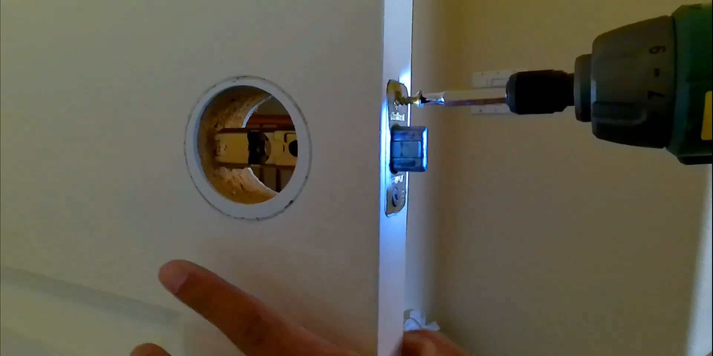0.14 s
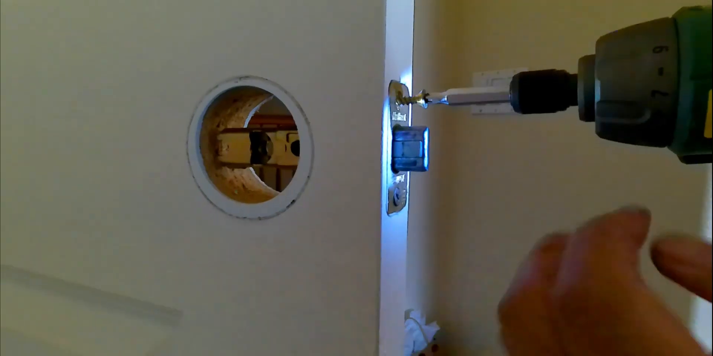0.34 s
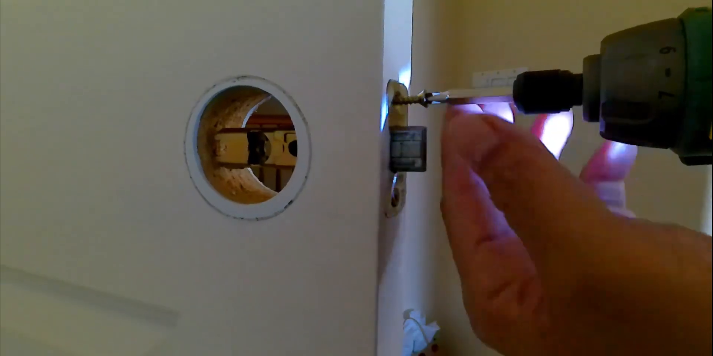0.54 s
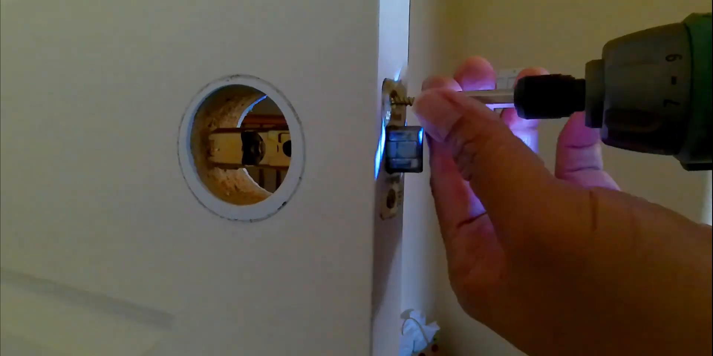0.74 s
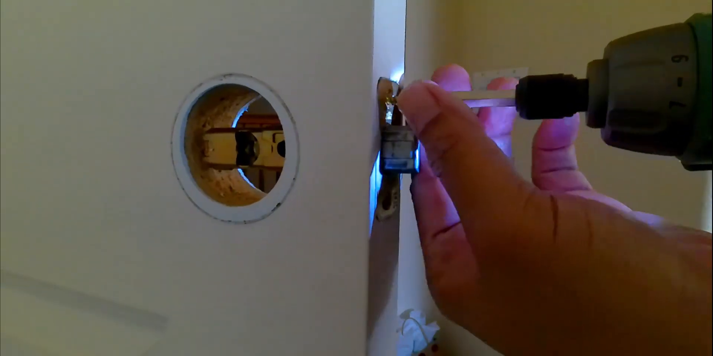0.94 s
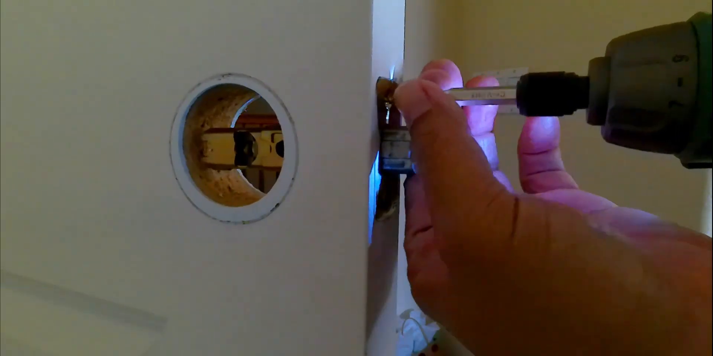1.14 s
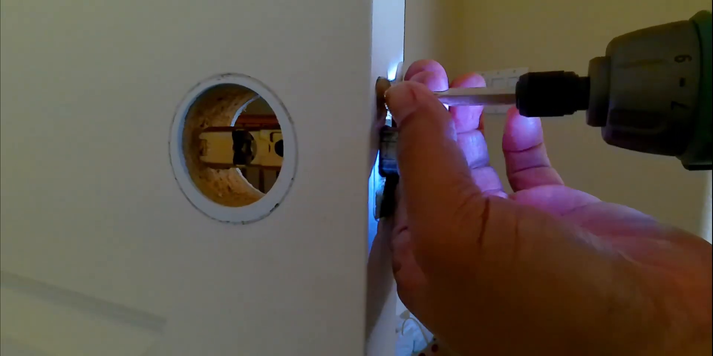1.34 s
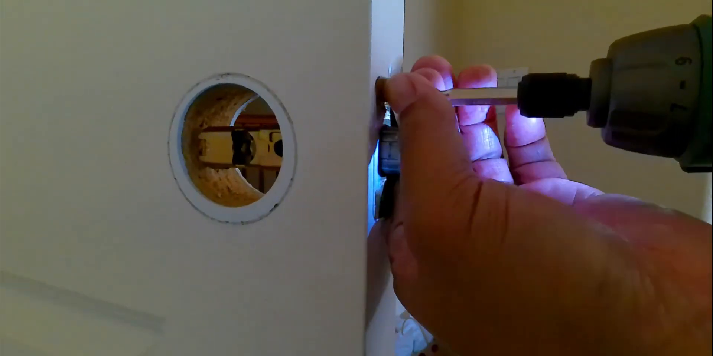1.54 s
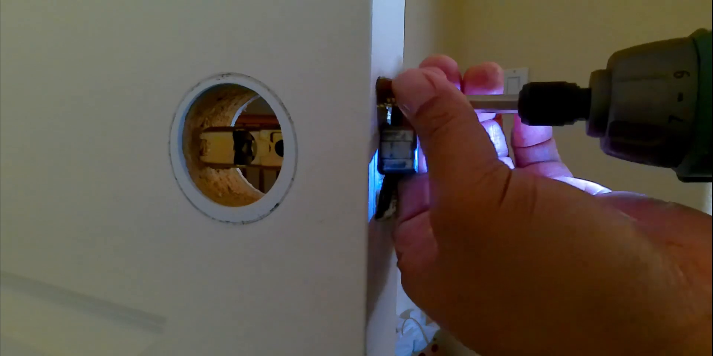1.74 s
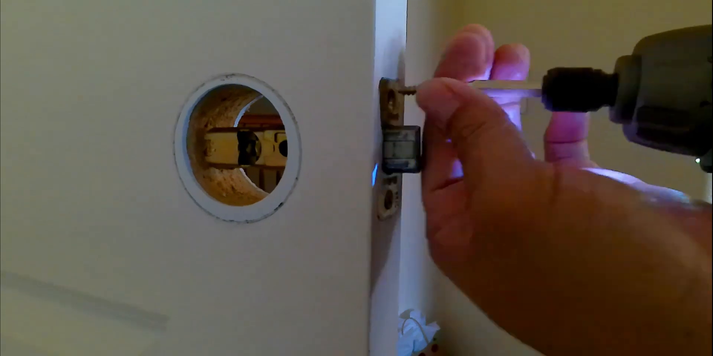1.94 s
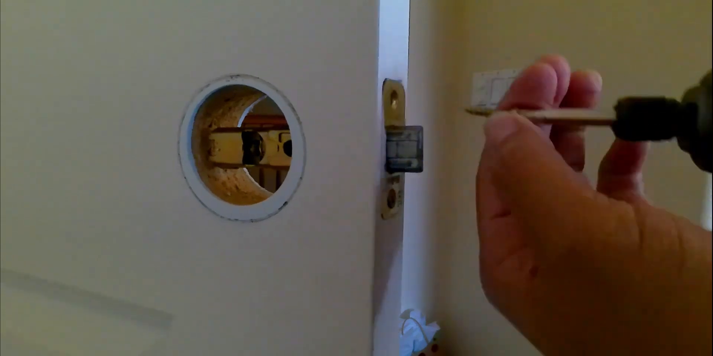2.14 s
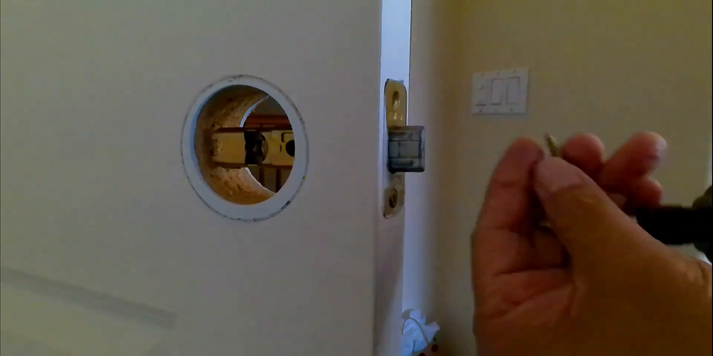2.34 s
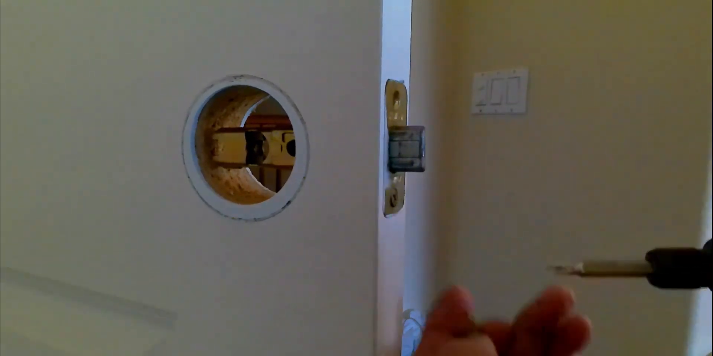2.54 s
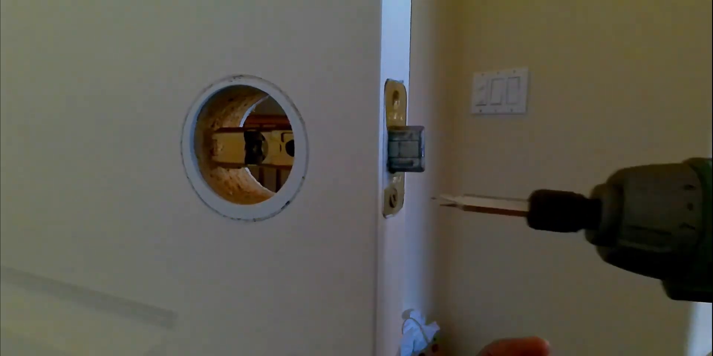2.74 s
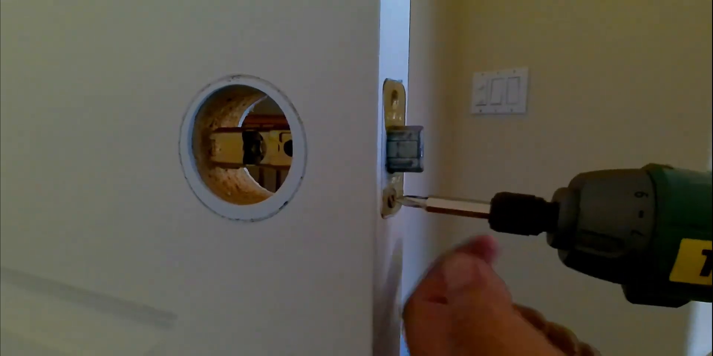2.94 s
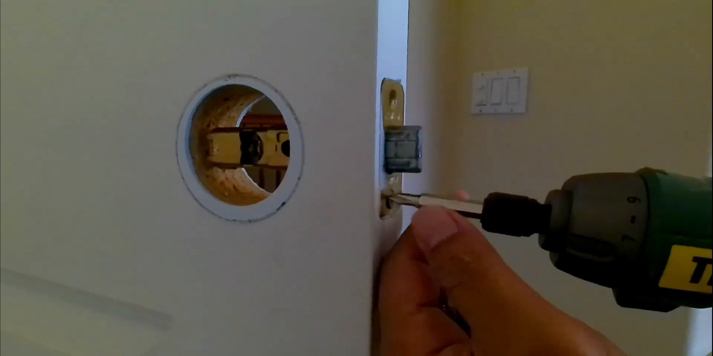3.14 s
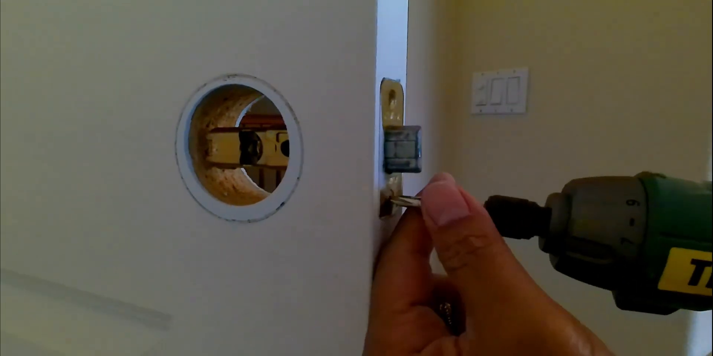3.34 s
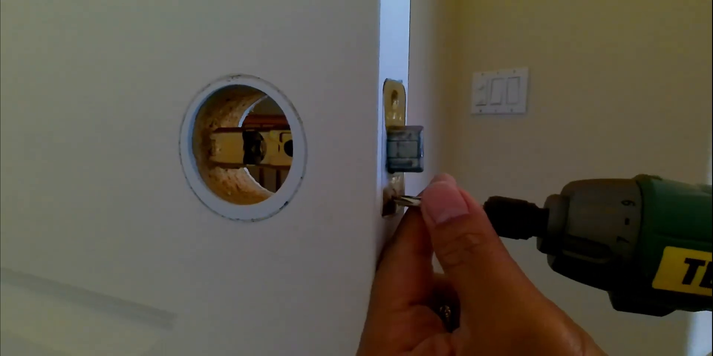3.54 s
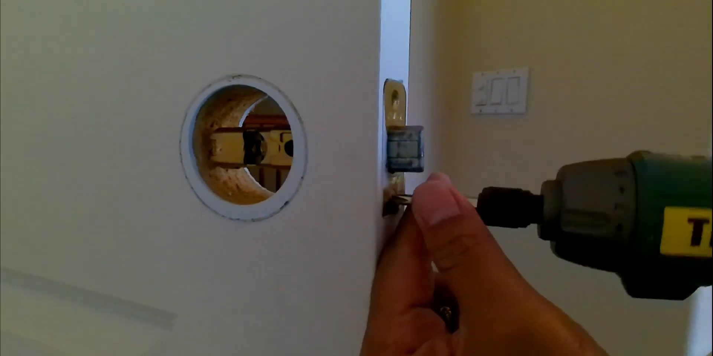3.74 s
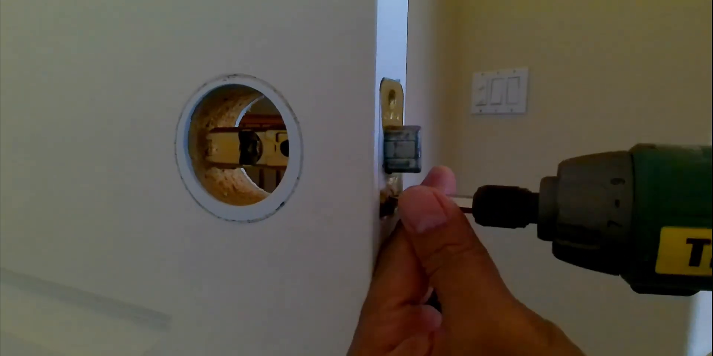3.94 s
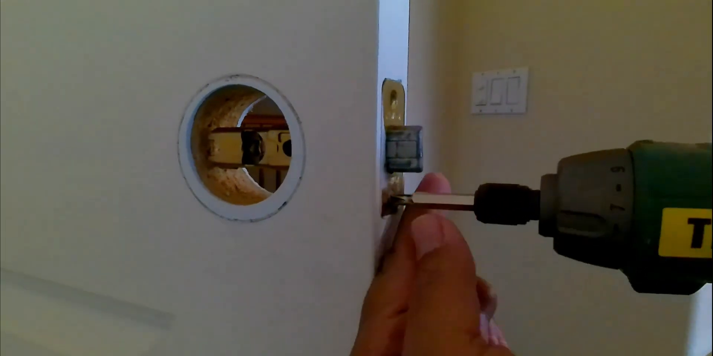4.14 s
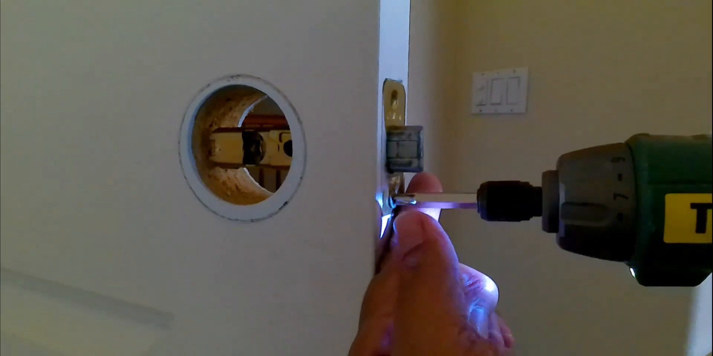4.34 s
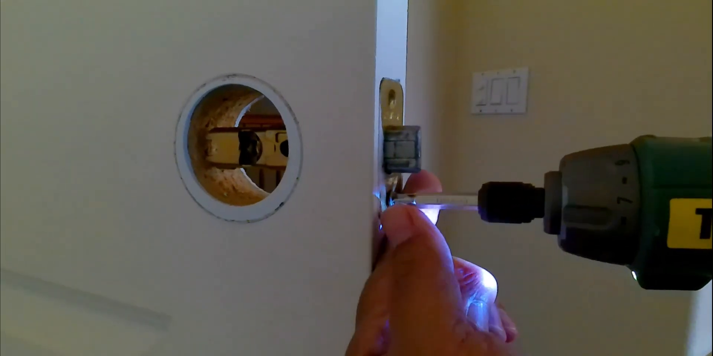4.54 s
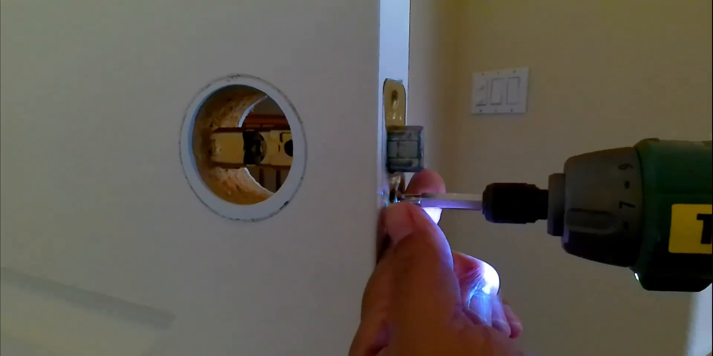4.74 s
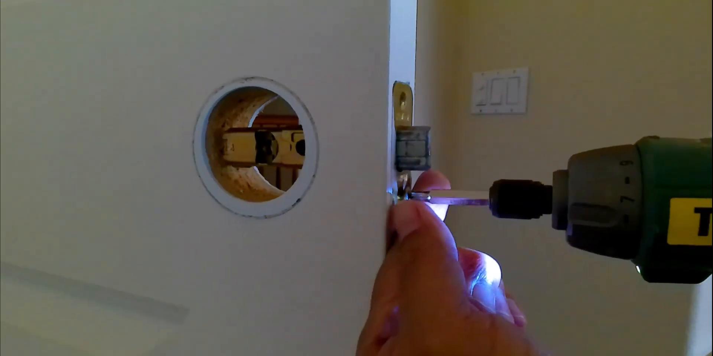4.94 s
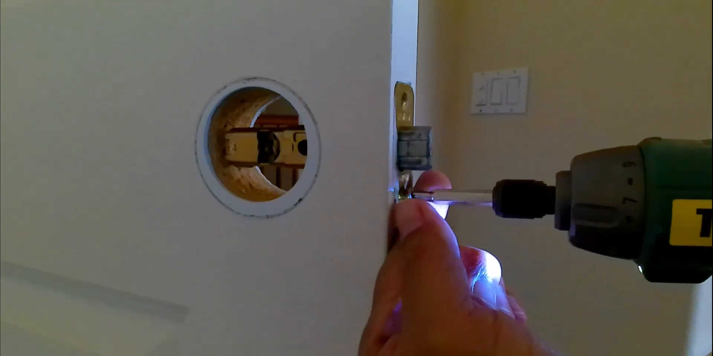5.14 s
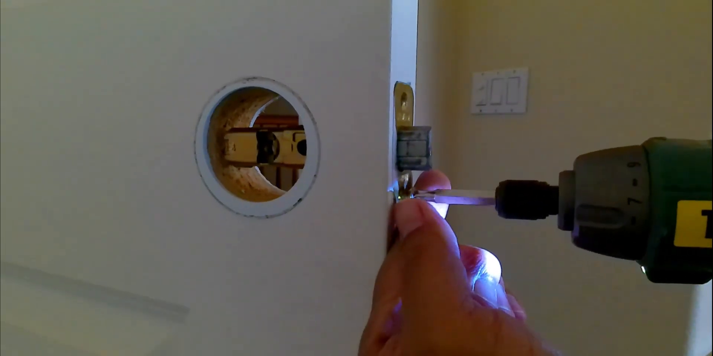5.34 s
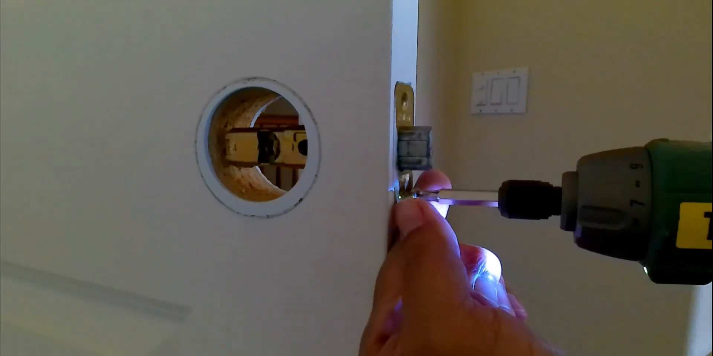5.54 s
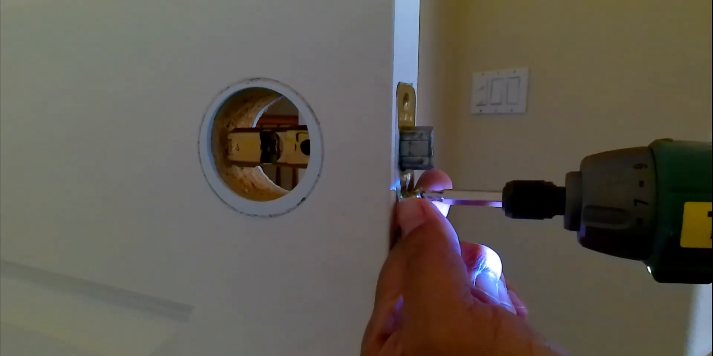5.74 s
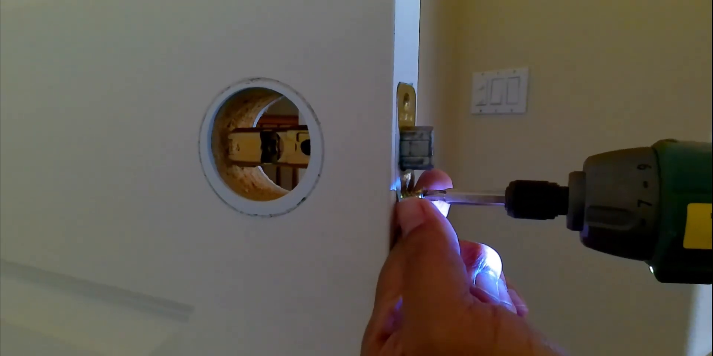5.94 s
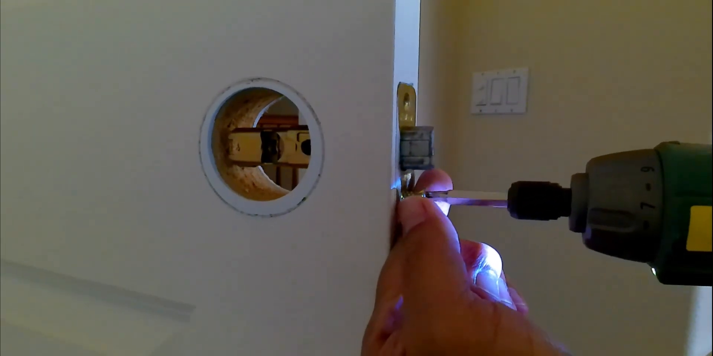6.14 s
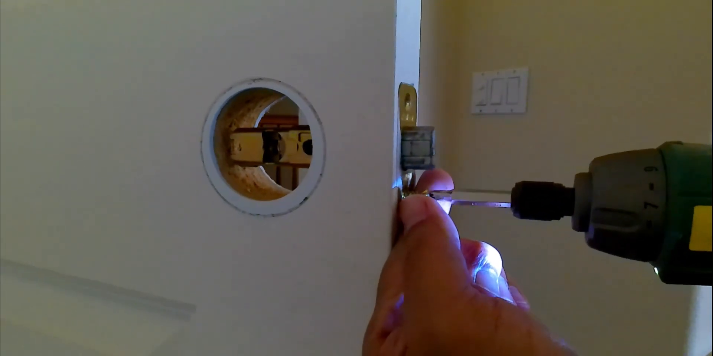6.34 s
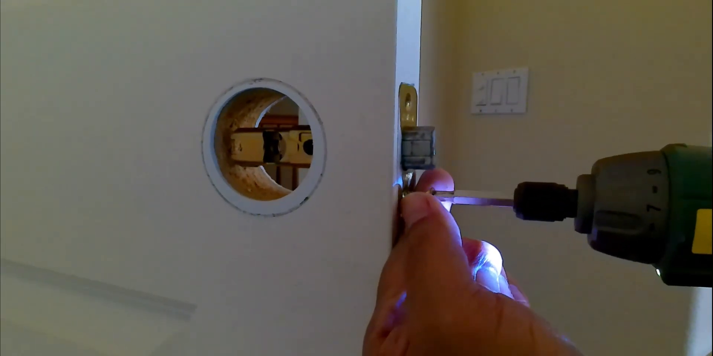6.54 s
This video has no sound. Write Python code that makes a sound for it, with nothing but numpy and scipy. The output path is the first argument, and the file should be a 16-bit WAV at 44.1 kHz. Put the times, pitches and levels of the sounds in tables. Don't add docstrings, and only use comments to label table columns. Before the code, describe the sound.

A cordless drill-driver is already running at close range, with a nasal, steady gear whine over a gritty plastic rattle. At about two seconds it is let go and its pitch slides quickly down to silence. Small clicks and soft knocks follow as the bit is fumbled onto a screw in the door. Just after four seconds the motor jolts back to full speed. Quiet small room, mono microphone, low rumble and faint hiss.

```python
import sys
import numpy as np
from scipy import signal
from scipy.fft import rfft, irfft, next_fast_len
from scipy.io import wavfile
from scipy.ndimage import uniform_filter1d, map_coordinates

SR = 44100
rng = np.random.default_rng(int(sys.argv[2]) if len(sys.argv) > 2 else 0)


def gain_from_db(level_db):
    decades = np.asarray(level_db, float) / 20
    return 10 ** decades


def generate_wav(signal):
    frames = np.transpose(np.atleast_2d(signal))
    scaled = np.clip(frames, -1, 1) * 32767
    pcm = np.round(scaled).astype(np.int16)
    wavfile.write(sys.argv[1], SR, pcm)


N = 294588
T = np.arange(N) / SR
RELEASE_S, ENGAGE_S = 2.05, 4.233
KICK_S, KICK_WIDE_S, MESH_KICK_WIDE_S = 4.274, .027, .011
FREE_TURNS = 76.5


def drill():
    rate, mesh_db, pole_db, rotor_db, low_db, high_db, top_db, rumble_db = controls()
    turns = np.cumsum(rate * (1 + .0008 * wobble(12))) / SR
    noisy = rattle(turns, rate, low_db, high_db, top_db, rumble_db)
    coasting = (T > RELEASE_S) & (T < 3)
    load_db = uniform_filter1d(low_db, size=SR // 30) - 7 - 1 * coasting
    tones = whine(turns, rate, load_db, waver_db=1.4) + mesh_tones(turns, rate, mesh_db, load_db, coasting)
    motor = order(9, turns, rate, pole_db) + order(3, turns, rate, rotor_db)
    return noisy, tones + motor


def mesh_tones(turns, rate, mesh_db, load_db, coasting):
    mesh = order(16, turns, rate, mesh_db + 1.2 * wobble(15))
    octave = order(32, turns, rate, mesh_db - 5 - .9 * np.abs(rate - 57) - 12 * (T < 3))
    third_db = load_db - 13 - 2 * np.clip(52 - rate, 0, None)
    return mesh + octave + order(48, turns, rate, third_db) * coasting


ORDERS_HEARD = [6, 12, 13, 15, 17, 18, 19, 22, 23, 26, 27, 29, 32, 35, 36, 42, 45, 48, 54, 56, 64, 66, 70]
UPPER_DB = [-21, -9, -7, -6, -20, -10, -3, -7, -10, -9, -3.5, -16, -11, -12, -14, -27, -27, -13, -16, -19,
            -11, -15, -17]
LOWER_DB = [-19, -11, -.5, -8, -12, -11, -4, -16, -14, -10, -5, -9, -19, -21, -17, -22, -17, -11.5, -12,
            -12, -17, -15, -14]
TIGHT_OWN_DB = {6: 9, 15: 1, 35: 10, 45: 5, 48: -13}


def whine(turns, rate, load_db, waver_db):
    tight = tightness()
    out = np.zeros(N)
    for k, upper_db, lower_db in zip(ORDERS_HEARD, UPPER_DB, LOWER_DB):
        tight_upper_db = 3 if k < 16 else -4.5
        at_upper = upper_db + tight_upper_db * tight
        at_lower = lower_db + TIGHT_OWN_DB.get(k, -6.5) * tight
        line_db = np.where(T > 3, at_lower, at_upper)
        out += order(k, turns, rate, load_db + line_db + waver_db * wobble(6))
    return out


# f/Hz, level/dB
RADIATE = [(200, -26), (750, -14), (900, -8), (1000, 0), (1300, 0), (1650, -3), (1850, 4), (2050, -3),
           (2400, -4), (2610, 2), (2760, -5), (3100, -12), (4900, -3)]


def order(k, turns, rate, level_db):
    glide_db = along(RADIATE, k * rate) - along(RADIATE, k * FREE_TURNS)
    return np.sqrt(2) * gain_from_db(level_db + glide_db) * np.sin(2 * np.pi * (k * turns + rng.random()))


# f/Hz, width/Hz, level/dB at the upper screw, level/dB at the lower screw, level/dB when slow
SHELL = [(384, 120, -17, -13, -20.5), (600, 290, -14.5, -12, -18), (952, 367, -5.5, -3.5, -10),
         (1255, 247, 0, 2, 0), (1492, 331, 0.5, 0, -2), (1830, 463, 1.5, -0.5, -4), (2123, 350, 0, -2, -8),
         (2640, 315, -3, -4.5, -10.5)]
VENTS = [(3536, 510, -11.5, -9.5, -9.5), (4318, 395, -2, -2.5, 0.5), (4900, 200, 3, 0.5, 4),
         (5320, 205, 0.5, 1.1, 3.5), (5886, 455, -6.5, -4, -2), (6770, 450, -12, -11.5, -11),
         (8130, 1230, -11.5, -12.5, -16.5), (10310, 2200, -18, -16.5, -20.5),
         (14700, 4600, -25.5, -26, -33)]


def rattle(turns, rate, low_db, high_db, top_db, rumble_db):
    door = unit(filtered(rng.standard_normal(N), modal(DOOR[3:8])))
    low_taps = teeth(turns, scatter_db=4, gate_db=2.4, spin_db=.6, worn=.35, hiss=.7)
    high_taps = teeth(turns, scatter_db=4.5, gate_db=1.4, spin_db=1.2, worn=.4, hiss=.8)
    top_taps = teeth(turns, scatter_db=3, gate_db=.7, spin_db=2.2, worn=.2, hiss=1.1)
    low = filtered(housing(low_taps, rate, SHELL), deaf_above(2880, 1.1))
    high = housing(high_taps, rate, VENTS[:6])
    top = housing(top_taps, rate, VENTS[6:])
    return gain_from_db(low_db - 3.0) * low + gain_from_db(high_db - .65) * high + gain_from_db(top_db) * top + gain_from_db(rumble_db) * door


def teeth(turns, scatter_db, gate_db, spin_db, worn, hiss):
    count = 16 * turns
    at = np.flatnonzero(np.diff(np.floor(count)))
    late = (np.floor(count[at + 1]) - count[at]) / (count[at + 1] - count[at])
    draw, wear = rng.standard_normal((N, 2))[at], rng.standard_normal(16)
    size = np.sign(draw[:, 0]) * gain_from_db(scatter_db * np.clip(draw[:, 1], -2, 2))
    size = size + worn * unit(wear - wear.mean())[np.floor(count[at]).astype(int) % 16]
    taps = np.bincount(at, size * (1 - late), N + 1)[:N] + np.bincount(at + 1, size * late, N + 1)[:N]
    taps = taps / np.sqrt(np.abs(uniform_filter1d(taps ** 2, size=SR // 15)) + 1e-6)
    taps = taps + hiss * rng.standard_normal(N)
    throb = gate_db * np.cos(2 * np.pi * 3 * turns) + .4 * gate_db * np.cos(2 * np.pi * turns)
    spin = np.cos(2 * np.pi * 16 / 9 * turns) + .75 * np.cos(4 * np.pi * 16 / 9 * turns)
    return taps * gain_from_db(throb + spin_db * spin + .67 * wobble(20))


def housing(taps, rate, modes):
    modes = np.array(modes)
    upper, lower, slow = (unit(filtered(taps, modal(modes[:, [0, 1, c]]))) for c in (2, 3, 4))
    fast = np.clip((rate - 58) / 15, 0, 1)
    x = fast * np.where(T > 3, lower, upper) + (1 - fast) * slow
    return x / np.sqrt(np.abs(uniform_filter1d(x ** 2, size=SR // 4)) + 1e-9)


# level/dB at the loose upper screw, level/dB at the loose lower screw,
# added while tight/dB upper, added while tight/dB lower, starting jolt/dB, power of speed
MESH = (-44.5, -40.5, 5.5, 6, 10, 0)
POLE = (-66, -49, 12.5, 1.5, -6, 0)
ROTOR = (-62, -55.5, 4.5, 9, -14, 4)
RATTLE_LOW = (-35, -35, 1.5, 2.5, 6.5, 1.14)
RATTLE_HIGH = (-37, -37.5, 3, 2.5, 11.5, 1.5)
RATTLE_TOP = (-47.5, -48, 1, 3, 7.5, 2)
RUMBLE = (-63, -59.5, 9.5, 11.5, 11, 3.5)
# t/s, half length/s, level/dB
EASES = [
    (4.32, 0.025, -4),
    (4.69, 0.085, -17),
    (4.95, .02, -2),
    (5.07, .025, -13),
    (5.14, 0.037, -14),
    (5.44, .04, -3),
    (5.85, .05, -11),
]
# t/s, half length/s, level/dB
LURCH = [
    (2.412, .011, -2),
    (2.455, .035, 4.5),
]


def controls():
    rate = speed()
    coast_db = -9 * ((T > RELEASE_S) & (T < ENGAGE_S))
    mesh_db = level(rate, MESH, 1.1, 5.06, MESH_KICK_WIDE_S) + moments(EASES) + coast_db
    pole_db, rotor_db = level(rate, POLE, 2.0, 22), level(rate, ROTOR, 1.9, 18)
    layers = (RATTLE_LOW, RATTLE_HIGH, RATTLE_TOP, RUMBLE)
    rattles = [level(rate, layer, .54, 8) + moments(LURCH) for layer in layers]
    return rate, mesh_db, pole_db, rotor_db, *rattles


# motor start t/s, speed lost to the tight screw/turns per s, time to come loose/s
SCREWS = [
    (-.02, .9, .42),
    (4.212, 4, .7),
]


def speed():
    lower = T > ENGAGE_S
    start, drag, loosen = (np.where(lower, b, a) for a, b in zip(*SCREWS))
    age, after = T - start, np.clip(T - RELEASE_S, 0, None) * ~lower
    held = FREE_TURNS + .1 * age - drag * np.exp(-(age / loosen) ** 2)
    driven = held * (1 - lower * np.exp(-age / .038))
    braked = 9 * (1 - np.exp(-after / .04)) + 135 * after
    return np.clip(driven - braked, 0, None)


def level(rate, layer, flutter_db, flutter_rate, kick_wide=KICK_WIDE_S):
    upper_db, lower_db, tight_upper_db, tight_lower_db, kick_db, power = layer
    tight = tightness()
    screw_db = np.where(T > ENGAGE_S, lower_db + tight_lower_db * tight, upper_db + tight_upper_db * tight)
    kick = np.exp(-((T - KICK_S) / kick_wide) ** 2)
    speed_db = 20 * power * np.log10(rate / FREE_TURNS + 1e-4)
    return screw_db + kick_db * kick + speed_db + flutter_db * wobble(flutter_rate)


def tightness():
    upper = np.exp(-(T / .93) ** 3)
    lower = np.exp(-(np.abs(T - ENGAGE_S) / .81) ** 3)
    return np.where(T > ENGAGE_S, lower, upper)


def moments(rows):
    return sum(db * np.exp(-((T - s) / wide) ** 4) for s, wide, db in rows)


# f/Hz, width/Hz, level/dB
DOOR = [(111, 22, -1), (184, 38, -7), (232, 34, -0.5), (320, 44, -1.5), (393, 21, 1.5), (459, 32, 1.5),
        (570, 53, 1.5), (707, 70, 0), (830, 175, -4.5)]
PLATE = [(1130, 140, 6.5), (1410, 120, 9), (1630, 130, 0), (1910, 210, -0.5), (2200, 190, -0.5),
         (2700, 430, -3)]
BIT = [(3200, 500, -2), (4080, 340, 8), (4500, 320, 8), (4880, 510, 7), (6100, 800, -1.5),
       (8400, 2500, -17)]
# t/s, level/dB, note f/Hz, rub/s
KNOCKS = [(1.122, -49, 350, 0.0087), (2.686, -63, 200, 0.0051), (3.042, -42, 650, 0.0046),
          (3.052, -44, 330, 0.011), (3.066, -44.5, 200, 0.01), (3.268, -55.5, 640, 0.027),
          (3.483, -51, 800, 0.0097), (3.598, -57, 800, 0.013), (3.622, -45, 600, 0.0069),
          (3.764, -54, 805, 0.0059), (3.911, -45, 480, 0.013), (3.922, -50.5, 220, .007),
          (4.135, -54, 450, .02), (4.262, -42.5, 110, 0.014), (4.285, -42, 400, 0.027)]
# t/s, plate level/dB, bit level/dB, rub/s
TAPS = [(2.424, -52, -49, 0.001), (2.469, -55, -63, .004), (2.954, -62, -60, .001), (3.04, -43, -47, .002),
        (3.044, -42.5, -53, 0.0049), (3.225, -43.5, -74, 0.00006), (3.466, -53.5, -60, 0.00069),
        (3.477, -49, -50, 0.0021), (3.483, -49.5, -48, 0.0071), (3.915, -58, -70, .012),
        (3.964, -49.5, -54, 0.0014), (3.973, -59, -62, .008), (4.215, -52, -59, 0.0006),
        (4.23, -52, -65, .001)]


def touches():
    out, t = np.zeros(N + SR), np.arange(SR // 3) / SR
    hz = np.fft.rfftfreq(len(t), 1 / SR)
    plate_body = modal(PLATE)(hz) * deaf_above(2700, .9)(hz) ** 2
    knocks = [(s, db, note, db - 15, db - 17, rub) for s, db, note, rub in KNOCKS]
    taps = [(s, plate - 14.5, 775, plate, bit, rub) for s, plate, bit, rub in TAPS]
    for s, door_db, door_hz, plate_db, bit_db, rub in knocks + taps:
        spot = modal(DOOR)(hz) * modal([(door_hz, .9 * door_hz, 0)])(hz)
        rubs = rng.standard_normal((3, len(t))) * np.exp(-t / max(rub, 5e-5))
        rubs[0] *= 1 - np.exp(-t / .0046)
        rings = irfft(rfft(rubs) * [spot, plate_body, modal(BIT)(hz)], len(t))
        rings /= np.abs(rings).max(axis=1)[:, None]
        first = round(s * SR)
        out[first:first + len(t)] += gain_from_db(np.array([door_db, plate_db, bit_db]) + 10) @ rings
    return out[:N] + scrape()


# t/s, level/dB
SCRAPE = [
    [(2.82, -72), (3.04, -59)],
    [(3.05, -57), (3.146, -72), (3.242, -69), (3.914, -73), (4.2, -60)],
]


def scrape():
    slide = sum(gain_from_db(np.interp(T, *np.transpose(rows), -120, -120)) for rows in SCRAPE)
    grains = rng.standard_normal(N) * gain_from_db(np.clip(3.5 * wobble(60), -9, 4))
    return slide * unit(filtered(grains, modal([(700, 570, -7.5), (1320, 430, -1.0)])))


# f/Hz, t60/s
ROOM = [(200, 0.68), (2000, 0.11), (10000, 0.32)]


def room(x):
    hz, t, z = signal.stft(rng.standard_normal(SR // 2), SR, nperseg=256)
    tail = signal.istft(z * gain_from_db(-60 * t / along(ROOM, hz)[:, None]), SR, nperseg=256)[1]
    return signal.fftconvolve(np.pad(x, (250, 0)), tail / np.linalg.norm(tail))[:N]


# f/Hz, level/dB
AIR = [(12, -33), (20, -4.5), (27, -10.5), (64, -10.5), (216, -16), (241, -14), (285, -17), (469, -25.5),
       (553, -25), (2910, -37.5), (3250, -38.5), (11900, -43.5), (14900, -42.5)]
# f/Hz, level/dB
MAINS = [(59.9, -68), (119.8, -73.5), (179.7, -74)]


def floor():
    hiss = unit(filtered(rng.standard_normal(N), lambda hz: gain_from_db(along(AIR, hz))))
    hum = sum(np.sqrt(2) * gain_from_db(db) * np.sin(2 * np.pi * hz * T) for hz, db in MAINS)
    return gain_from_db(-53) * hiss + hum


def unit(x):
    return x / np.sqrt(np.mean(x ** 2) + 1e-20)


def along(points, hz):
    f, v = np.transpose(points)
    return np.interp(np.log(hz + 1), np.log(f + 1), v)


def wobble(rate):
    return map_coordinates(rng.standard_normal(int(N * rate / SR) + 4), [np.arange(N) * rate / SR])


def filtered(x, response):
    m = next_fast_len(N + SR // 2)
    return irfft(rfft(x, m) * response(np.fft.rfftfreq(m, 1 / SR)), m)[..., :N]


def modal(modes):
    def response(f):
        return sum((-1) ** k * gain_from_db(db) * 1j * f * w / (c * c - f * f + 1j * f * w)
                   for k, (c, w, db) in enumerate(modes))
    return response


def deaf_above(top_hz, damping):
    return lambda hz: 1 / (1 - (hz / top_hz) ** 2 + damping * 1j * hz / top_hz)


def scene():
    (noisy, tones), knocks = drill(), touches()
    answer = room(gain_from_db(-12) * noisy + gain_from_db(-8.5) * knocks) + gain_from_db(-27) * room(tones)
    return (noisy + tones + knocks + answer + floor())[None]


def roll_off(x):
    return signal.sosfilt(signal.butter(12, 15930, fs=SR, output="sos"), x)


def record(dry):
    finished = filtered(dry, lambda hz: hz < 14875) - .0048
    return roll_off(finished)


dry = scene()
out = record(dry)
generate_wav(out)
```